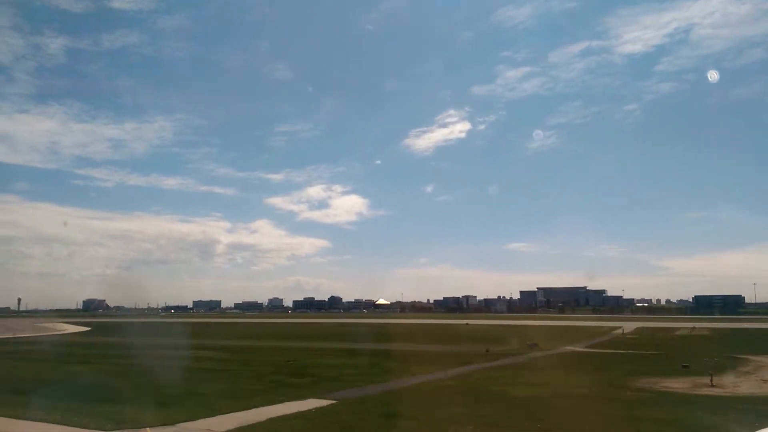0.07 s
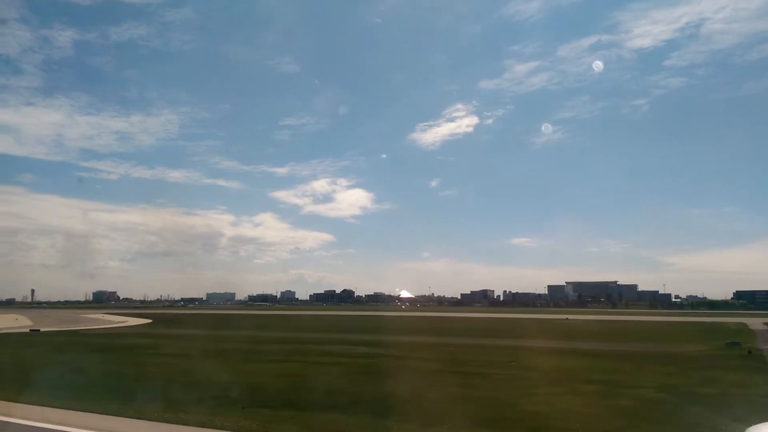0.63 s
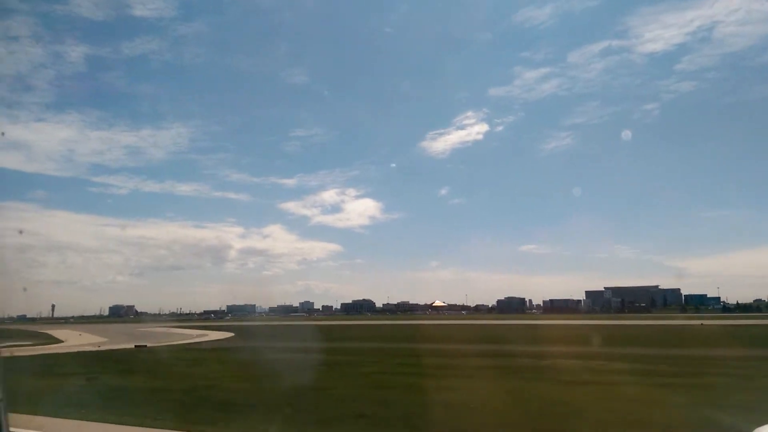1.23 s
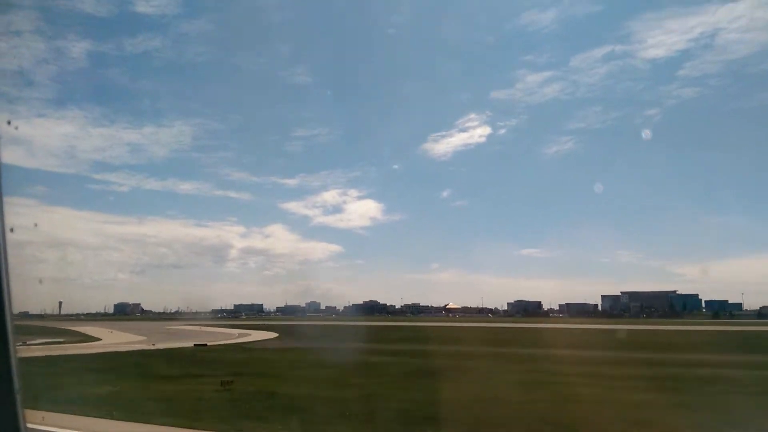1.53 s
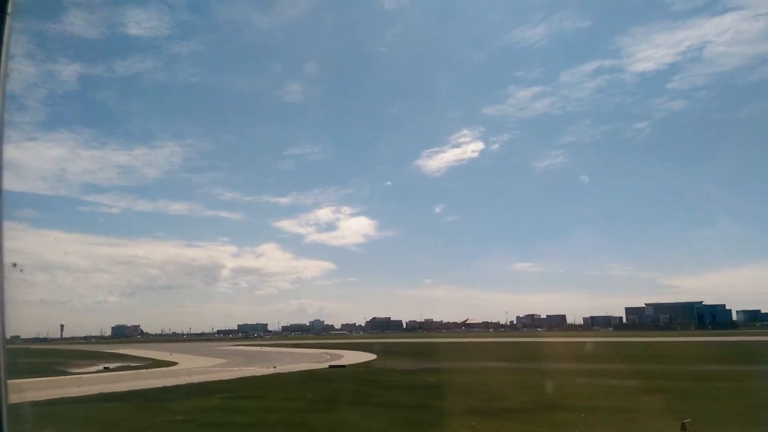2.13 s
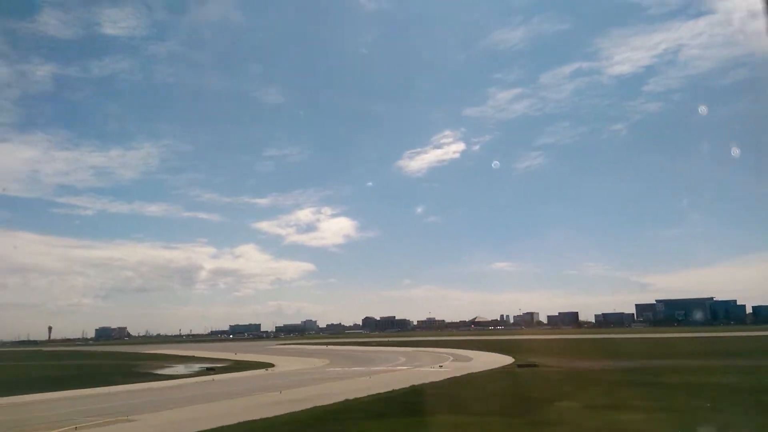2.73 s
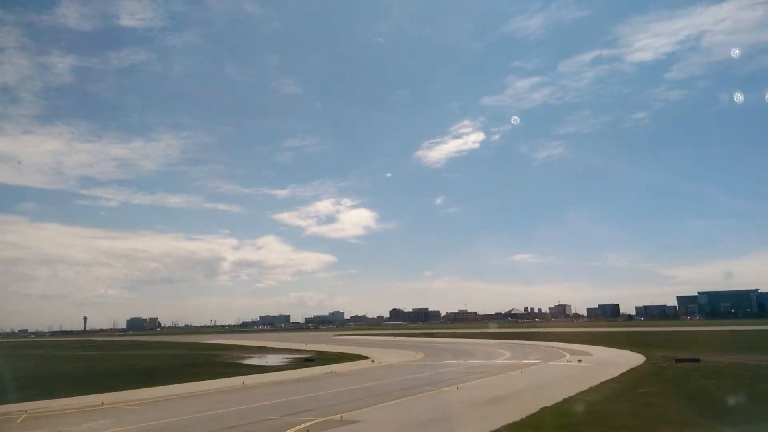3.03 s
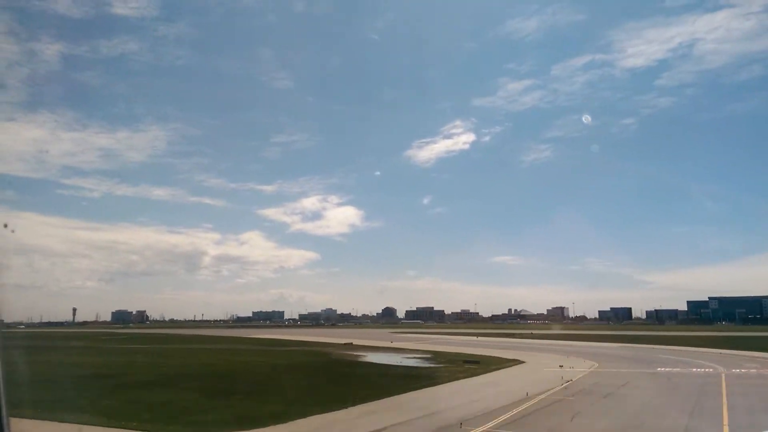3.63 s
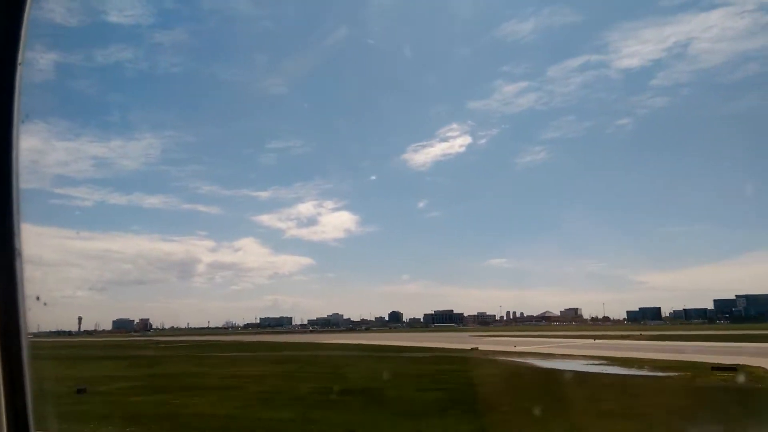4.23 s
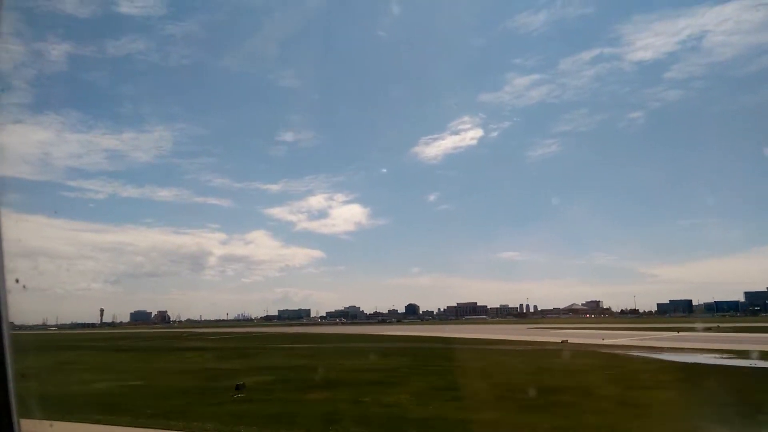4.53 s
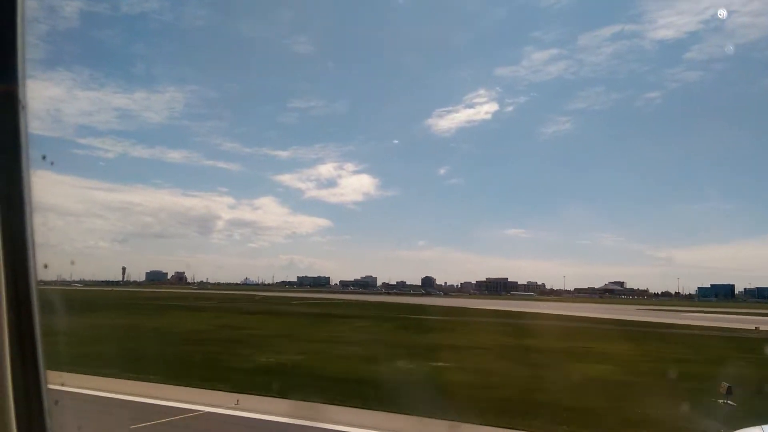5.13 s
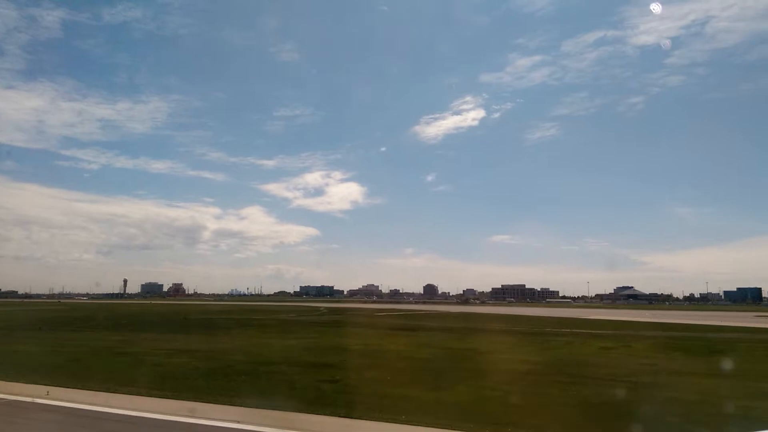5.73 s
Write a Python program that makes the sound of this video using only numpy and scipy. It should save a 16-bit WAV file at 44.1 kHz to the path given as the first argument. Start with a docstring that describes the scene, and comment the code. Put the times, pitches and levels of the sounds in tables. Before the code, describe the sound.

Airliner wheels rumble and thud through a humming cabin while loose panels rattle, clack and knock over a faint fan whine.

```python
"""A deep rumble fills an airliner cabin, heard at a window seat as the wheels roll over the airfield.
The fuselage booms and hums and a low drone swells; air rushes from the vents and a fan whines.
Joints in the pavement thud through the undercarriage and shake the plastic cabin trim
into rattles, ticks, hollow knocks, a jingling latch, one scrape and one hard clack."""
import sys
import numpy as np
from scipy import signal
from scipy.fft import rfft, irfft, next_fast_len
from scipy.io import wavfile
from scipy.ndimage import map_coordinates

SR = 44100
rng = np.random.default_rng(int(sys.argv[2]) if len(sys.argv) > 2 else 0)


def materialize(psi):
    """Save the field psi as 16-bit PCM at rate SR to the path in sys.argv[1].

    A 1-D psi becomes a single channel; in a 2-D psi each row is a channel.
    """
    bounded = np.clip(np.atleast_2d(psi).T, -1, 1)
    quanta = np.round(bounded * 32767).astype(np.int16)
    wavfile.write(sys.argv[1], SR, quanta)


N = 254898
TIME_S = np.arange(N) / SR


def amp(db):
    """Decibels to gain."""
    return 10 ** (np.asarray(db) / 20)


def unit_rms(x):
    """x scaled to rms 1."""
    return x / np.sqrt(np.mean(x ** 2) + 1e-20)


def timeline(points):
    """(time, value) points interpolated to every sample."""
    return np.interp(TIME_S, *np.transpose(points))


def wobble(knots_per_s):
    """Smooth random curve, deviation about 1."""
    coarse = np.arange(0, N + 16, 16)
    knots = rng.standard_normal(int(N * knots_per_s / SR) + 4)
    curve = map_coordinates(knots, [coarse * knots_per_s / SR])
    return np.interp(np.arange(N), coarse, curve)


def burst(start_s, rise_s, t60_s):
    """Impact envelope of peak 1: quick rise, exponential decay."""
    t = np.arange(SR // 2) / SR
    shape = (1 - np.exp(-t / rise_s)) * amp(-60 * t / t60_s)
    return np.pad(shape / shape.max(), (round(start_s * SR), N))[:N]


def held(start_s, length_s, rise_s, t60_s):
    """Sustained envelope: attack, hold, exponential decay."""
    t = np.maximum(TIME_S - start_s, 0)
    return (1 - np.exp(-t / rise_s)) * amp(-60 * np.maximum(t - length_s, 0) / t60_s)


def filtered(x, response):
    """x through a complex frequency response."""
    size = next_fast_len(N + SR // 2)
    return irfft(rfft(x, size) * response(np.fft.rfftfreq(size, 1 / SR)), size)[..., :N]


def spectrum(points):
    """Response through (Hz, dB) points on a log frequency axis."""
    hz, db = np.transpose(points)
    return lambda f: amp(np.interp(np.log(f + 1), np.log(hz + 1), db))


def body(modes):
    """Response of (Hz, width, dB) resonances, summed with alternating signs."""
    return lambda f: sum((-1) ** k * amp(db) * 1j * f * width / (hz * hz - f * f + 1j * f * width)
                         for k, (hz, width, db) in enumerate(modes))


def struck(start_s, response, right_lag_s=0.0001):
    """One clean contact ringing a body: stereo, peak 1."""
    size = SR // 4
    hz = np.fft.rfftfreq(size, 1 / SR)
    delay = np.exp(-2j * np.pi * np.outer([0, right_lag_s], hz))
    ring = irfft(response(hz) * delay, size)
    return np.pad(ring / np.abs(ring).max(), ((0, 0), (round(start_s * SR), N)))[:, :N]


def ringing(start_s, hz, width_hz):
    """A quarter second of one noise-driven resonance: stereo, rms 1."""
    pole = np.exp((2j * hz - width_hz) * np.pi / SR)
    ring = signal.lfilter([1], [1, -pole], rng.standard_normal((2, SR // 4))).imag
    return np.pad(unit_rms(ring), ((0, 0), (round(start_s * SR), N)))[:, :N]


# Port imbalance: (frequency [Hz], left minus right [dB])
PORT_BALANCE = [(150, -0.25), (450, 1), (600, 1.5), (750, -9), (1000, -1), (1500, 4.5), (3200, -1),
                (6000, 2.5), (9500, 2.5), (11200, 12), (15500, 6.5)]


def ports(pair):
    """Each of the two microphone ports adds its own colour."""
    return filtered(pair, lambda hz: spectrum(PORT_BALANCE)(hz) ** np.array([[0.5], [-0.5]]))


# Stereo width: (frequency [Hz], side over mid [dB])
WIDTH = [(35, -31), (150, -17.5), (330, -19.5), (550, -10.5), (800, -3), (1400, 1.5), (4000, 0)]


def noise(response):
    """Coloured stereo noise of rms 1: alike in the bass, diffuse above."""
    def mid_side(hz):
        angle = np.arctan(spectrum(WIDTH)(hz))
        return response(hz) * np.array([np.cos(angle), np.sin(angle)])
    mid, side = filtered(rng.standard_normal((2, N)), mid_side)
    return unit_rms(ports(np.array([mid + side, mid - side])))


# Vent air: (frequency [Hz], relative density [dB])
AIR_SPECTRUM = [(300, -48), (750, -6), (1300, -3), (1750, 1.5), (2100, 5.5), (2500, 1), (3300, -9),
                (4400, -7.5), (6800, -13.5), (7600, -6.5), (8600, -10), (9500, -8), (10500, -18.5),
                (15500, -29)]


def vents():
    """Air rushes steadily from the vents."""
    return amp(-38.5 + 0.23 * wobble(3.45)) * noise(spectrum(AIR_SPECTRUM))


# Fan whine: (time [s], level [dB])
WHINE_LEVEL = [(0, -45), (0.1, -50), (0.25, -40), (0.33, -49), (0.5, -45), (0.62, -40.5), (0.76, -41),
               (0.84, -45), (1.18, -42.5), (1.28, -48), (1.4, -43), (1.46, -50), (1.55, -40), (1.62, -45),
               (1.67, -42), (1.76, -46), (1.85, -38), (1.93, -45), (2.3, -47), (2.66, -45.5), (3.0, -54),
               (3.62, -42.5), (3.76, -63), (4.4, -50), (5.2, -48), (5.56, -43), (5.78, -45)]
# Fan tones: (frequency [Hz], relative level [dB], wander [Hz])
FAN_TONES = [(2105.5, 0, 3), (1995, -10.5, 4), (2131, -13, 12), (4262, -14.5, 12), (7425, -20, 26),
             (9582, -18.5, 20)]


def fan():
    """The fan whines in wavering tones; the high ones swell less."""
    whine_db = timeline(WHINE_LEVEL) + 2 * wobble(20)
    mean_db = whine_db.mean()
    tones = np.zeros((2, N))
    for hz, db, wander_hz in FAN_TONES:
        phase = 2 * np.pi * np.cumsum(hz + wander_hz * wobble(35)) / SR
        swell_db = (0.22 if hz > 3000 else 1) * (whine_db - mean_db)
        # Standing waves give each port its own level and phase.
        port_db = 1.6 * np.array([wobble(8.2), wobble(13)])
        tone = np.sqrt(2) * np.sin(phase + np.array([[1.3], [0]]))
        tones += amp(mean_db + db + swell_db + port_db) * tone
    return tones


# Fuselage boom: (time [s], level [dB])
BOOM_LEVEL_DB = [(0, -16), (0.95, -16), (2.0, -16.5), (2.8, -18), (3.4, -18.5), (4.7, -19.5), (4.9, -15.5),
                 (5.78, -15.5)]
# Boom and wall roar: (frequency [Hz], relative density [dB])
BOOM_SPECTRUM = [(50, -49), (80, -3), (100, -1), (150, 0), (172, -9), (195, -3.5), (230, -17.5),
                 (330, -27.5), (700, -97)]
WALL_SPECTRUM = [(120, -25), (230, 1), (290, -1), (340, 1.5), (420, -5.5), (550, -13), (750, -18.5),
                 (1100, -24.5), (2500, -58)]


def fuselage():
    """Rolling makes the fuselage boom; the roar of the walls follows it and slowly grows."""
    boom_db = timeline(BOOM_LEVEL_DB)
    growth_db_per_s = 0.3642
    wall_db = -27.5 + 0.69 * (boom_db - boom_db.mean()) + growth_db_per_s * TIME_S + wobble(6)
    return amp(boom_db) * noise(spectrum(BOOM_SPECTRUM)) + amp(wall_db) * noise(spectrum(WALL_SPECTRUM))


# Cabin hums: (time [s], length [s], level [dB], pitch [Hz])
CABIN_HUMS = [(0, 0.23, -20, 129.6), (0.25, 0.4, -20, 102), (0.52, 0.2, -19.5, 149.1),
              (0.83, 0.25, -18, 112.2), (0, 0.56, -37, 413.4), (1.374, 0.3, -18.5, 96.2),
              (1.66, 0.25, -20, 151.5), (1.844, 0.28, -20, 127.3), (1.103, 3.45, -32.5, 196.7),
              (2.297, 0.34, -20.5, 59.67), (2.717, 0.38, -21, 94), (3.58, 0.52, -24, 74.2),
              (4.82, 0.22, -19.5, 131.5), (5.378, 0.17, -19.5, 130.7)]


def hums():
    """Wavering hums rise out of the cabin boom and sink back."""
    total = np.zeros(N)
    for start_s, length_s, db, hz in CABIN_HUMS:
        phase = 2 * np.pi * np.cumsum(hz * (1 + 0.01776 * wobble(12))) / SR
        envelope = amp(db + 1.5 * wobble(9.7)) * held(start_s, length_s, rise_s=0.045, t60_s=0.45)
        total += envelope * np.sqrt(2) * np.sin(phase)
    return total


# Airframe drone: (time [s], relative level [dB])
DRONE_LEVEL = [(0, -34), (0.9, -46), (1.05, -27), (1.65, -24), (2.1, -26), (3.35, -14.5), (3.7, -21),
               (4.15, -10.5), (5.1, -14.5), (5.25, -22), (5.78, -19)]


def drone():
    """The airframe vibrates at a deep note and its octave, sinking in pitch as the aircraft slows."""
    start_hz, sag_hz_per_s = 37.26, 0.46
    phase = 2 * np.pi * np.cumsum(start_hz - sag_hz_per_s * TIME_S) / SR
    octave = amp(-7.5 + 0.86 * wobble(9.4)) * np.sin(2 * phase + 1.5 * wobble(5.9))
    return amp(timeline(DRONE_LEVEL) - 5) * np.sqrt(2) * (np.sin(phase) + octave)


# Wheel rumble: (frequency [Hz], relative density [dB])
WHEEL_SPECTRUM = [(12, -16), (24, -13), (38, -8), (60, 2.5), (78, -1), (100, -0.5), (170, -60), (400, -97)]
# Rough pavement: (time [s], length [s], level [dB])
ROUGH_PATCHES = [(0.994, .08, -13), (1.225, 0.17, -18), (2.295, 0.3, -22), (3.966, 0.18, -15),
                 (5.2, 0.82, -16.5)]


def wheels():
    """Wheel rumble builds to a steady level and surges over rough pavement."""
    start_db, settled_db, build_s = -26, -21, 1
    steady = amp(settled_db + (start_db - settled_db) * np.exp(-TIME_S / build_s))
    surges = sum(amp(db) * held(start_s, length_s, rise_s=0.029, t60_s=0.54)
                 for start_s, length_s, db in ROUGH_PATCHES)
    return np.hypot(steady, surges) * noise(spectrum(WHEEL_SPECTRUM))


# Trim chatter: (time [s], level [dB])
CHATTER_LEVEL = [(0, -42), (0.9, -46), (1.15, -38), (1.55, -40.5), (2.25, -48), (2.36, -32.5),
                 (2.65, -41.5), (2.77, -38.5), (2.92, -38), (3.12, -38.5), (3.45, -42.5), (4.4, -43.5),
                 (5.5, -36.5), (5.78, -33.5)]
# Trim resonances: (frequency [Hz], width [Hz], gain [dB])
TRIM_MODES = [(720, 178, 3), (1024, 167, 2.5), (1226, 190, 0.5), (1572, 137, 0), (2040, 306, 2),
              (2183, 490, -3.5)]
# Bright edge of the contacts: (frequency [Hz], relative density [dB])
EDGE_SPECTRUM = [(1500, -2), (2800, 4), (4200, -4), (6500, -9), (10000, -9), (15000, -31)]


def chatter():
    """Loose trim chatters throughout."""
    contacts = amp(3.6 * wobble(50))
    plastic = noise(body(TRIM_MODES)) + amp(-11) * noise(spectrum(EDGE_SPECTRUM))
    return amp(timeline(CHATTER_LEVEL)) * unit_rms(contacts * plastic)


# Plastic ticks: (time [s], relative level [dB])
TICK_HITS = [(0.423, -44), (0.611, -45), (1.145, -39), (1.223, -46), (1.403, -45), (1.987, -37),
             (2.150, -42), (2.353, -34), (2.421, -39), (2.460, -39), (3.269, -30.5), (3.300, -42),
             (3.332, -39), (3.631, -34), (3.711, -35.5), (4.634, -42)]
# Tick colour: (frequency [Hz], relative density [dB])
TICK_SPECTRUM = [(2000, -8), (5000, 8.5), (9000, 3), (11200, 5), (14000, 0), (16000, -14)]


def ticks():
    """Small plastic parts click; faint random ticks join in, stronger as the trim chatters."""
    rise_s, t60_s = 0.0044, 0.092
    chatter_db = timeline(CHATTER_LEVEL)
    strays = sum(amp(-56 + 4 * strength) * burst(position * N / SR, rise_s, t60_s)
                 for position, strength in rng.random(size=(36, 2)))
    strays *= amp(0.7 * (chatter_db - chatter_db.mean()))
    hits = sum(amp(db) * burst(start_s, rise_s, t60_s) for start_s, db in TICK_HITS)
    grain = unit_rms(amp(3 * wobble(450)) * noise(spectrum(TICK_SPECTRUM)))
    return amp(-4.5) * (hits + strays) * grain


def scrape():
    """As the cabin flexes, two panels rub in quick, uneven slips and one creaks."""
    start_s = 2.312
    envelope = amp(-36) * held(start_s, length_s=0.09, rise_s=0.028, t60_s=0.45)
    slips = unit_rms(amp(3 * wobble(300)))
    grit = noise(spectrum(EDGE_SPECTRUM)) + amp(-14) * noise(spectrum(TICK_SPECTRUM))
    grit += amp(-12) * noise(body(TRIM_MODES))
    creak = amp(-0.5) * ringing(start_s, hz=1550, width_hz=80)
    return envelope * (slips * grit + creak)


# Latch shakes: (time [s], level [dB], T60 [s])
LATCH_SHAKES = [(0.994, -34, .06), (1.144, -32, .06), (1.257, -39, .05), (1.399, -33, .11), (1.57, -42, .1)]
# Latch resonances: (frequency [Hz], width [Hz], gain [dB])
LATCH_MODES = [(2120, 110, 5), (2900, 130, 1), (3450, 140, -1), (3900, 120, -8), (4630, 120, -7)]


def latch():
    """A small loose latch jingles with the same notes at each shake."""
    rise_s = 0.0023
    envelope = sum(amp(db) * burst(start_s, rise_s, t60_s) for start_s, db, t60_s in LATCH_SHAKES)
    return envelope * noise(body(LATCH_MODES))


# Trim rattles: (time [s], relative level [dB], relative edge gain [dB], ring [Hz])
TRIM_RATTLES = [(0.994, -29, -10, 1400), (1.041, -25, -16, 756), (1.135, -26.5, -16, 1290),
                (1.243, -26, -13, 1280), (1.311, -23, -24, 2210), (1.400, -26, -16, 1500),
                (1.494, -32, -18, 1400), (1.661, -20, -24, 2000), (1.735, -28.5, -22, 1280),
                (2.314, -23, -8.5, 1920), (2.385, -23, -16, 1550), (2.508, -27, -8, 1250),
                (2.586, -21.5, -18, 2190), (2.673, -21.5, -15, 1360), (2.686, -24, -14, 1040),
                (2.816, -26, -4, 1580), (2.876, -24, -18, 760), (2.918, -28, -6, 1570),
                (2.946, -34, -2, 2010), (3.046, -28, -5, 990), (3.118, -27.5, -3.5, 2000),
                (3.237, -26, -11, 1650), (3.625, -23, -7, 1940), (4.103, -29.5, -4, 2110),
                (4.632, -33, 0.5, 1540), (4.85, -34, 0, 2700), (5.095, -28, -8, 1620)]


def rattles():
    """Bumps rattle the trim: one clear tap, then a flurry of tiny contacts; each part has its note."""
    rise_s, width_hz = 0.005, 160
    shakes, edge_shakes = np.zeros((2, N))
    rings, taps = np.zeros((2, 2, N))
    for start_s, db, edge_db, hz in TRIM_RATTLES:
        t60_s = 0.14 / (hz / 1000) ** 0.27  # small parts die away faster
        shake = amp(db) * burst(start_s, rise_s, t60_s)
        shakes += shake
        edge_shakes += amp(edge_db) * shake
        rings += shake * ringing(start_s, hz, width_hz)
        taps += amp(db - 3) * struck(start_s + rise_s, body([(hz, width_hz, 0)]))
    contacts = unit_rms(amp(2.2 * wobble(280)))
    lining = amp(-9) * shakes * noise(body(TRIM_MODES))
    edge = amp(-4.5) * edge_shakes * noise(spectrum(EDGE_SPECTRUM))
    return contacts * (lining + edge) + amp(-11) * rings + ports(taps)


# Panel knocks: (time [s], level [dB], low-pass corner [Hz])
PANEL_KNOCKS = [(5.045, -26, 1500), (5.1275, -19.5, 2000), (5.443, -16, 2300), (5.5205, -19, 1700),
                (5.709, -17, 1600)]
# Hollow panel resonances: (frequency [Hz], width [Hz], gain [dB])
HOLLOW_MODES = [(930, 82, 0), (1140, 110, -6.5), (1665, 68, -4.5)]


def knocks():
    """A hollow panel taps its frame, duller on softer contacts; the cabin answers briefly."""
    panel = body(HOLLOW_MODES)

    def dulled(corner_hz):
        return lambda hz: panel(hz) / (1 + 1.4j * hz / corner_hz - (hz / corner_hz) ** 2)
    direct = sum(amp(db) * struck(start_s, dulled(corner_hz)) for start_s, db, corner_hz in PANEL_KNOCKS)
    tails = sum(amp(db) * burst(start_s, rise_s=0.0027, t60_s=0.053) for start_s, db, _ in PANEL_KNOCKS)
    return ports(direct) + amp(-16) * tails * noise(panel)


# Hard contacts with the frame: (time [s], level [dB])
CLACK_HITS = [(3.273, -17.5), (3.2773, -16.5), (3.2808, -17.5), (3.295, -25)]
# Slapped panel resonances: (frequency [Hz], width [Hz], gain [dB])
CLACK_MODES = [(430, 200, 4), (700, 180, 3), (1000, 210, 2), (1340, 170, 3), (1900, 300, -1),
               (2650, 360, -6.5), (3800, 500, -15)]


def clack():
    """A panel shudders, slaps its frame in quick succession and is damped at once."""
    peak_s, build_s, t60_s = 3.278, 0.015, 0.1
    panel = body(CLACK_MODES)
    t = TIME_S - peak_s
    envelope = np.exp(np.minimum(t, 0) / build_s) * amp(-60 * np.maximum(t, 0) / t60_s)
    contacts = unit_rms(amp(2.4 * wobble(400)))
    shudder = contacts * (noise(panel) + amp(-12) * noise(spectrum(EDGE_SPECTRUM)))
    slaps = sum(amp(db) * struck(start_s, panel, right_lag_s=0.00022) for start_s, db in CLACK_HITS)
    return amp(-22.5) * envelope * shudder + ports(slaps)


# Pavement joints: (time [s], relative level [dB], pitch [Hz])
JOINTS = [(0.968, 4.5, 114), (1.032, 4, 60.5), (1.273, -3, 55.4), (1.352, -10, 47.3), (2.345, 1, 70),
          (2.390, 0.5, 58), (2.491, 0.5, 63), (2.556, 5, 72), (2.612, 1, 60), (3.266, -6, 143),
          (3.542, 0.5, 40.3), (3.978, 3.5, 74), (5.439, -4, 50), (5.562, -3, 42), (5.638, -4, 42)]


def thuds():
    """Each joint gives the undercarriage a short, low push."""
    total = np.zeros(N)
    for start_s, db, hz in JOINTS:
        envelope = amp(db - 7) * burst(start_s, rise_s=0.0035, t60_s=0.09)
        total += envelope * np.sin(2 * np.pi * hz * (TIME_S - start_s))
    return total


def scene():
    """Rumble, ventilation and shaken trim, summed at the seat."""
    rumble = wheels() + fuselage() + hums() + drone() + thuds()
    ventilation = vents() + fan()
    trim = chatter() + rattles() + latch() + clack() + scrape() + ticks() + knocks()
    return rumble + ventilation + trim


def record(dry):
    """Soft peak limiter, then a brick-wall low-pass."""
    ceiling, cutoff_hz = 0.9, 15720
    rounded = dry / (1 + np.abs(dry / ceiling) ** 8) ** (1 / 8)
    return filtered(rounded, lambda hz: hz < cutoff_hz)


dry = scene()
out = record(dry)
materialize(out)
```